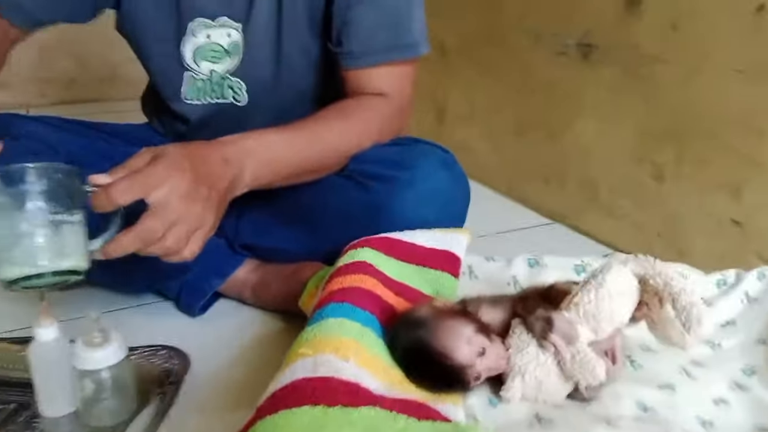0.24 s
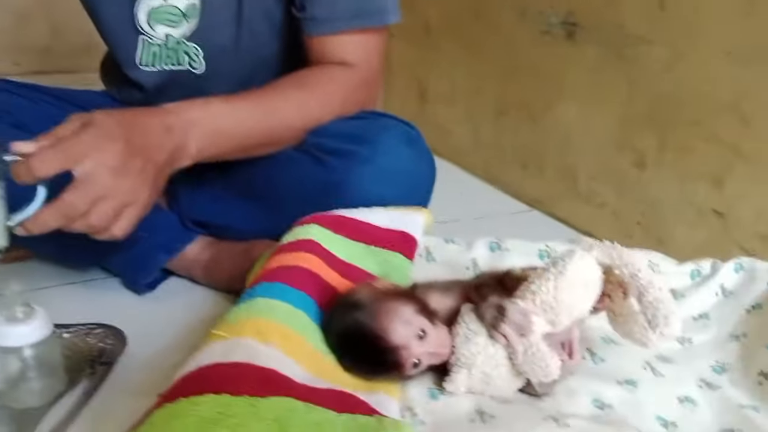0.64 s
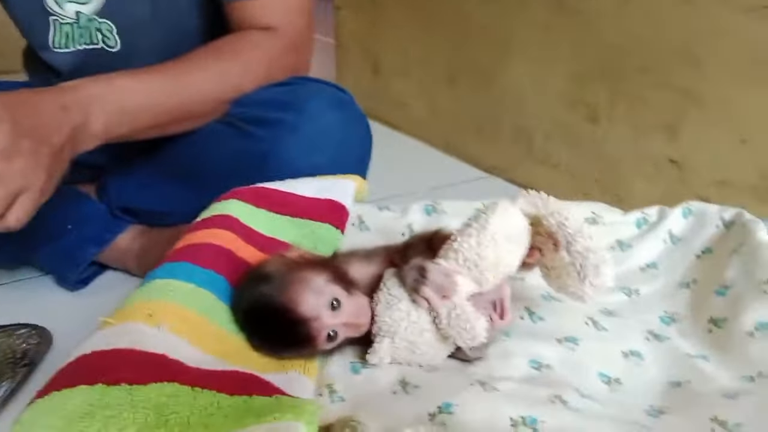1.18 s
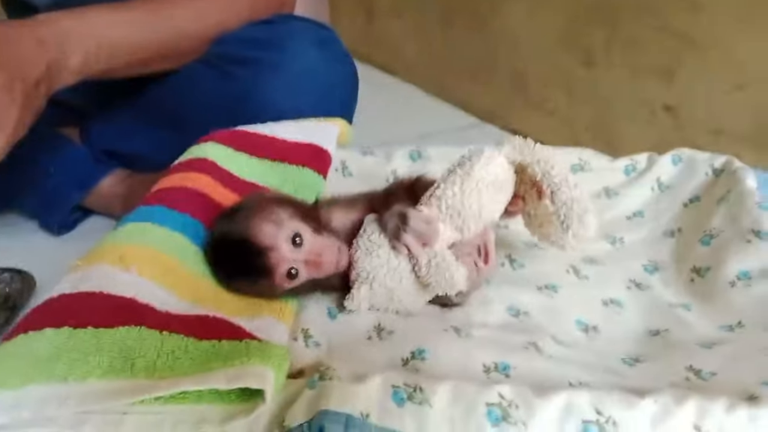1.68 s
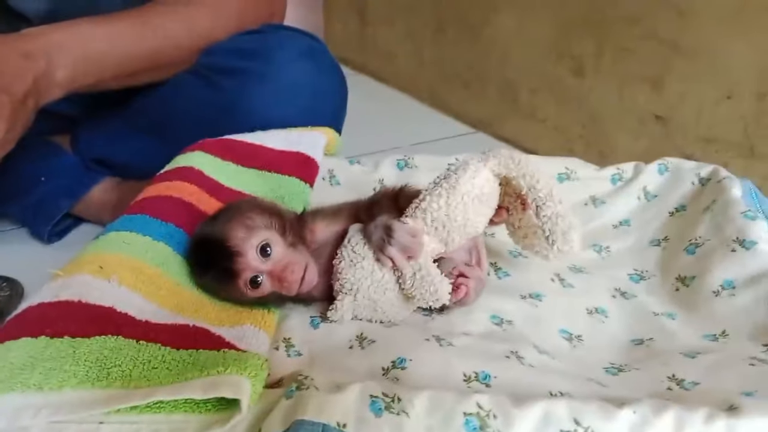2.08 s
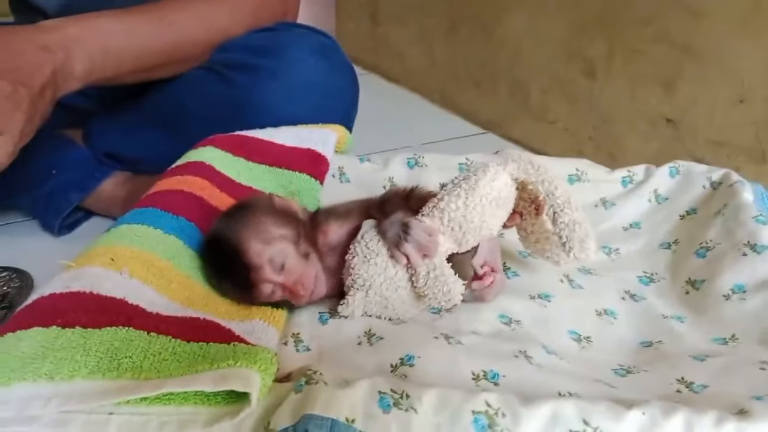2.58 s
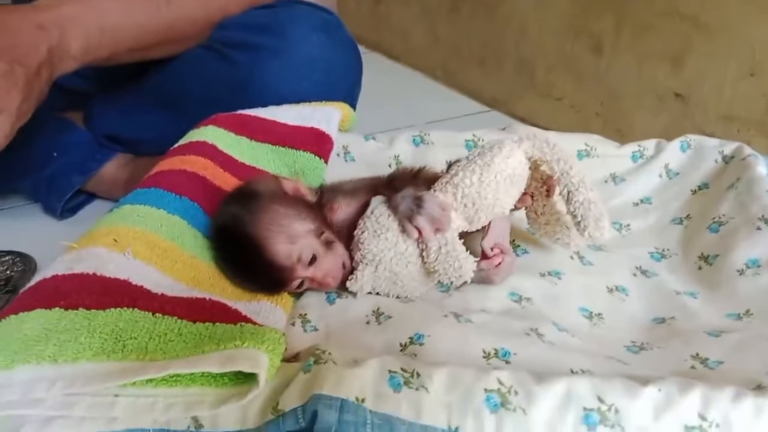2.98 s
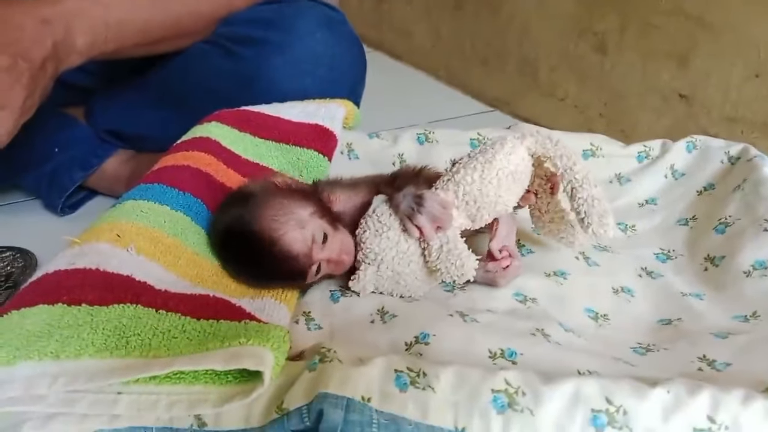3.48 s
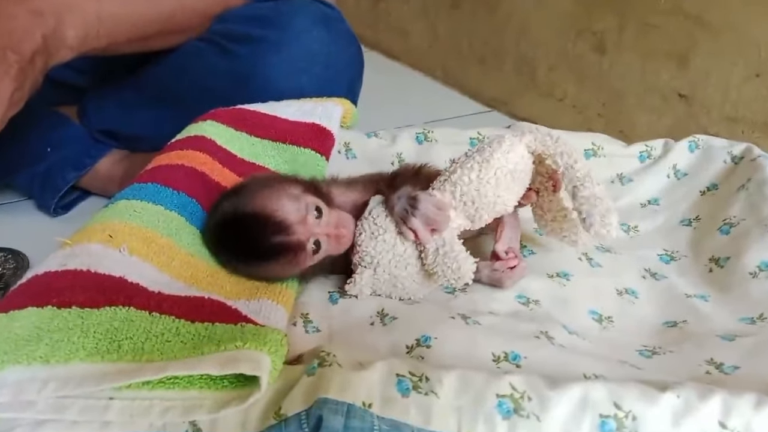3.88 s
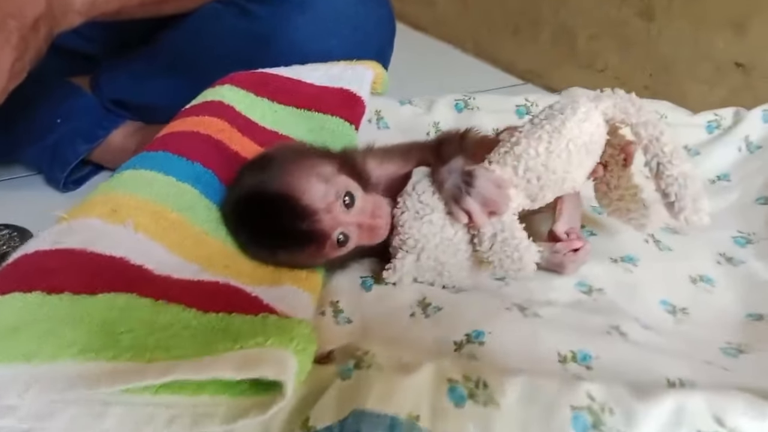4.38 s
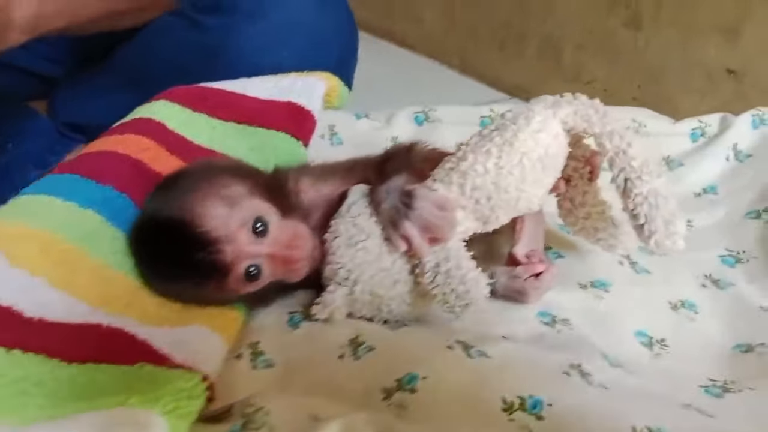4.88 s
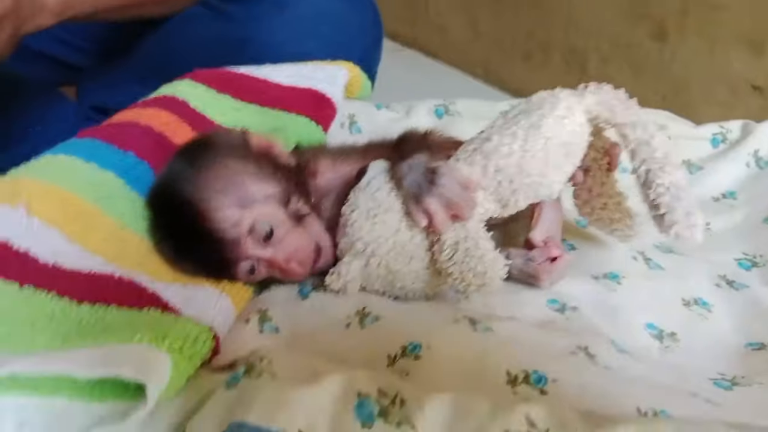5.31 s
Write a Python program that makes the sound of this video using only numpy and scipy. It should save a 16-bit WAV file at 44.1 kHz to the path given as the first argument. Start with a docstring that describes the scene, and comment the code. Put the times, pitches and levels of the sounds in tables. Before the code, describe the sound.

Indoors in a bare, tiled room, a metal spoon taps irregularly inside a glass mug of liquid. Bright clinks come first, then short scrapes and hollow, duller knocks. A low rumble swells and sinks beneath, strongest around the middle, then almost vanishes. Late on, a baby monkey gives one thin, quavering squeak with a faint after-note, before the last knocks and clinks. One-channel sound with faint hiss and a softened extreme top.

```python
"""A metal spoon stirs liquid in a glass mug in a bare, tiled room, over faint hiss with a narrow band that rises and sinks.
From the start a low rumble (shaped noise) swells and sinks, bright clinks (ringing modes plus a noise crack) come
irregularly, and faint sine tones fade. After a second short noise scrapes join in, then duller knocks low in the mug.
The rumble is strongest near 3 s and dies down to a trace near 4 s. At about 4.6 s a baby monkey gives a thin squeak
(a quavering sine with overtones) and a faint after-note; the last knocks and clinks follow."""
import sys
import numpy as np
from scipy import signal
from scipy.fft import rfft, irfft, next_fast_len
from scipy.io import wavfile
from scipy.ndimage import uniform_filter1d, map_coordinates

SR = 44100
rng = np.random.default_rng(int(sys.argv[2]) if len(sys.argv) > 2 else 0)


def dump_mix(stems):
    """Bounce the given channels to the path in sys.argv[1] as a 16-bit WAV at rate SR."""
    frames = np.atleast_2d(stems).T  # one column per channel
    limited = np.clip(frames, -1, 1)  # hard clip at full scale
    pcm = np.round(limited * 32767).astype(np.int16)
    wavfile.write(sys.argv[1], SR, pcm)


N = 244666  # samples in the scene
LENGTH = int(0.55 * SR)  # samples in one blow, and in the room's echo


def amp(db):
    """Turn decibels into a gain."""
    return 10 ** (np.asarray(db) / 20)


def unit(x):
    """Scale a sound to an average strength (rms) of 1."""
    return x / np.sqrt(np.mean(x ** 2) + 1e-30)


def blend(low, high, share):
    """Go part of the way from one set of levels to another."""
    return np.asarray(low) + share * np.subtract(high, low)


def wobble(rate):
    """Draw a smooth random curve through this many random points a second."""
    points = rng.standard_normal(int(N * rate / SR) + 4)
    return map_coordinates(points, [np.arange(N) * rate / SR])


def shape(points, hz):
    """Read the gain at each frequency from (f/Hz, level/dB) points, joined on a log axis."""
    f, db = np.transpose(points)
    return amp(np.interp(np.log(hz + 1), np.log(f + 1), db))


def resonance(hz, centre_hz, width_hz):
    """Gain of one steep-sided resonance, 1 at its centre."""
    return 1 / (1 + (2 * (hz - centre_hz) / width_hz) ** 2) ** 2


def filtered(x, response):
    """Multiply the spectrum of a sound by a gain that depends on frequency."""
    size = next_fast_len(len(x) + SR // 4)  # padded, so the end does not wrap onto the start
    spectrum = rfft(x, size) * response(np.fft.rfftfreq(size, 1 / SR))
    return irfft(spectrum, size)[:len(x)]


def noise(response, size=N):
    """Make coloured noise of rms 1."""
    return unit(filtered(rng.standard_normal(size), response))


def add(track, s, sound):
    """Mix a sound into the track at s seconds."""
    start = max(round(s * SR), 0)
    track[start:start + len(sound)] += sound[:max(len(track) - start, 0)]


def room(x, wet_db):
    """Direct sound, then a diffuse tail that builds up, with a cluster of echoes from the far wall."""
    # how long the room takes to fade by 60 dB: f/Hz, t60/s
    walls = [(400, 0.4), (1200, 0.45), (3000, 0.42), (9000, 0.33), (14000, 0.3)]
    build_s = 0.0055
    slap_db, slap_s, slap_width_s = 3.0, 0.038, 0.0069  # the far wall's echoes
    hz, frames, spectrum = signal.stft(rng.standard_normal(LENGTH), SR, nperseg=256)
    t60 = np.interp(hz, *np.transpose(walls))
    fading = spectrum * amp(-60 * frames / t60[:, None])
    tail = signal.istft(fading, nperseg=256)[1][:LENGTH]
    t = np.arange(LENGTH) / SR
    slap = amp(slap_db * np.exp(-((t - slap_s) / slap_width_s) ** 2))
    tail = tail * (1 - np.exp(-t / build_s)) * slap
    answer = amp(wet_db) * tail / np.linalg.norm(tail)
    answer[0] = 1  # the direct sound
    return signal.fftconvolve(x, answer)[:len(x)]


def hiss():
    """Quiet room air is shaped noise; a narrow, whistling band of noise swells and sinks in a regular cycle."""
    # colour of the room air: f/Hz, level/dB
    air_colour = [(35, -32), (60, -9.5), (93, -3), (159, -2.5), (291, -13.5), (1910, -26), (4850, -38),
                  (9080, -36), (9970, -29), (10900, -37.5), (15500, -38)]
    air_db = -71.0
    period_s, low_db, high_db = 0.865, -84, -70.5
    crest = 0.65  # share of the cycle at which the band is loudest
    cycle = (np.arange(N) / SR / period_s) % 1
    whistle_db = np.interp(cycle, [0, crest, 1], [low_db, high_db, low_db])
    whistle = noise(lambda hz: resonance(hz, 9910, 360))
    air = noise(lambda hz: shape(air_colour, hz))
    return amp(air_db) * air + amp(whistle_db) * whistle


def rumble_gain(band_hz, share_db):
    """Strength of one band of the rumble: its share of the drone, plus the swells centred near it."""
    # level of the steady drone: t/s, level/dB
    drone = [(0, -57.5), (.85, -66), (1.5, -59), (3.4, -59), (3.95, -64), (4.2, -79.5), (5.55, -77)]
    # swells of the rumble: peak t/s, level at the centre/dB, centre f/Hz
    swells = [(.22, -44, 95), (0.499, -41, 76.4), (.7, -56.5, 62), (1.0, -53.5, 91.7), (1.329, -47, 96),
              (1.62, -48.5, 97), (2.22, -57, 95.4), (2.72, -51.5, 70), (2.84, -51, 102),
              (3.071, -37.5, 109.5), (3.2, -42, 98), (3.379, -43.5, 110.3), (3.56, -48, 98.4),
              (3.719, -53.5, 90), (3.979, -53, 108)]
    rise_db_per_s, fall_db_per_s = 232, 146.5
    focus_db = 37.5  # a swell is this much weaker one octave from its centre
    t = np.arange(N) / SR
    drone_db = np.interp(t, *np.transpose(drone))
    power = amp(drone_db + share_db) ** 2
    for s, db, centre_hz in swells:
        fade_db = np.maximum(rise_db_per_s * (s - t), fall_db_per_s * (t - s))
        off_centre_db = focus_db * np.log2(band_hz / centre_hz) ** 2
        power += amp(db - fade_db - off_centre_db) ** 2
    return np.sqrt(power)


def rumble():
    """A low drone of evened-out noise in narrow resonances, with a broader, looser flutter of noise."""
    # resonances of the drone: f/Hz, width/Hz, share of the drone/dB
    boom_bands = [(67.5, 29, -6), (97, 22, -1)]
    # colour of the flutter: f/Hz, level/dB
    flutter_colour = [(20, -13.5), (50, -7.5), (100, -1), (135, 5), (170, -0.5), (215, -6.5), (260, -16.5),
                      (400, -31), (800, -70)]
    track = rumble_gain(152, -8.5) * noise(lambda hz: shape(flutter_colour, hz))
    for centre_hz, width_hz, share_db in boom_bands:
        boom = noise(lambda hz: resonance(hz, centre_hz, width_hz))
        strength = np.sqrt(np.abs(uniform_filter1d(boom ** 2, size=SR // 16)) + 1e-6)
        steady = unit(boom / np.sqrt(strength))  # a drone is steadier than free noise
        track += rumble_gain(centre_hz, share_db) * steady
    return track


def tones():
    """Faint sines waver in pitch and level while they fade away."""
    # lingering tones: start t/s, end t/s, f/Hz, level at the start/dB, fall/dB per s
    faint_tones = [(0, 0.405, 567, -62, 20), (0.737, 1.02, 608.3, -55.5, 50.5),
                   (.738, 1.02, 2130, -57.5, 77.5)]
    attack_s, release_s = 0.0094, 0.058
    waver = 0.0067  # share of the pitch
    t, track = np.arange(N) / SR, np.zeros(N)
    for start, end, hz, db, fall_db in faint_tones:
        gate = np.clip(np.minimum((t - start) / attack_s, (end - t) / release_s), 0, 1)
        phase = 2 * np.pi * hz * np.cumsum(1 + waver * wobble(35)) / SR
        level_db = db - fall_db * np.maximum(t - start, 0) + 2 * wobble(30)
        track += gate * amp(level_db) * np.sin(phase)
    return track


def squeak():
    """The monkey's thin, rough call: a quavering sine with two overtones starts sharp and settles in pitch."""
    # the squeak and its faint after-note: start t/s, length/s, level/dB, settled pitch f/Hz
    calls = [(4.567, 0.18, -62, 3416), (4.77, 0.2, -76, 3445)]
    attack_s, release_s = 0.019, 0.038
    overshoot, settle_s = 0.055, 0.058  # sharp by this share of the pitch at first
    second_db, third_db = -8.5, -14.0  # overtones
    track = np.zeros(N)
    for start, length, db, pitch_hz in calls:
        t = np.maximum(np.arange(N) / SR - start, 0)
        pitch = pitch_hz * (1 + overshoot * np.exp(-t / settle_s))
        quaver = 0.018 * wobble(90) + 0.025 * wobble(500)  # the fast part is the roughness
        phase = 2 * np.pi * np.cumsum(pitch * (1 + quaver)) / SR
        voice = np.sin(phase) + amp(second_db) * np.sin(2 * phase) + amp(third_db) * np.sin(3 * phase)
        gate = np.clip(np.minimum(t / attack_s, (length - t) / release_s), 0, 1)
        track += amp(db) * voice * gate
    return room(track, wet_db=0.0)


def scrapes():
    """The spoon slides along the glass: tiny slips of uneven size fade as the spoon slows."""
    # slides: t/s, fade length/s (cut off at half a second), level/dB, centre f/Hz, width/Hz
    slides = [(1.097, 0.059, -76.5, 2180, 3500), (1.289, 0.049, -61, 7400, 2600),
              (1.315, 0.071, -57.5, 1850, 1360), (1.326, 0.17, -78, 3600, 900),
              (1.861, .06, -59, 1170, 1190), (2.418, 0.57, -83, 1220, 1470),
              (4.539, 0.032, -59.5, 1260, 1135), (4.894, .05, -82.5, 7500, 1770)]
    track, t = np.zeros(N), np.arange(SR // 2) / SR
    for s, length, db, centre_hz, width_hz in slides:
        slip_size = np.exp(rng.standard_normal(len(t)))
        slips = rng.standard_normal(len(t)) * slip_size
        rasp = unit(filtered(slips, lambda hz: resonance(hz, centre_hz, width_hz)))
        fade = np.sqrt(np.clip(1 - t / length, 0, 1))
        add(track, s, amp(db) * rasp * fade)
    return room(track, wet_db=-0.5)


def blow(modes, registers, levels_db, crack_db, crack_t60, scatter_db=0.0):
    """A noise crack plus ringing modes; where the spoon lands sets how strongly each register speaks."""
    # colour of the instant of contact: f/Hz, level/dB
    crack_colour = [(400, -28), (700, -9), (1300, -3), (3000, -3), (4200, 2.5), (4900, -24.5), (5600, 4),
                    (6200, -8), (7600, -4.5), (10800, 1), (11800, -14), (13000, -12.5), (13900, -20.5),
                    (15000, -23.5)]
    t = np.arange(LENGTH) / SR
    ring = np.zeros(LENGTH)
    for hz, db, t60 in modes:
        mode_db = db + scatter_db * rng.normal() - 60 * t / t60
        ring += amp(mode_db) * np.sin(2 * np.pi * (hz * t + rng.random()))
    crack = amp(crack_db - 60 * t / crack_t60) * noise(lambda hz: shape(crack_colour, hz), size=LENGTH)
    hit = np.zeros(LENGTH)
    for band, db in zip(registers, levels_db):
        sos = signal.butter(N=6, Wn=band, btype="band", fs=SR, output="sos")
        hit += amp(db) * unit(signal.sosfilt(sos, ring + crack))
    return hit


def knocks():
    """Contacts under the liquid are cushioned and hollow; the spoon touches again a moment later."""
    # dull knocks low in the mug: t/s, level/dB, hollowness/0-1
    dull_hits = [(1.749, -81.5, 0.5), (1.871, -63.5, 0), (2.009, -65.5, 0.85), (2.413, -75, 0.97),
                 (2.505, -66, 1), (2.702, -63.5, 0.94), (2.831, -71.5, 1), (3.351, -59, 0.3),
                 (4.763, -64, 1), (5.02, -62, 0.6), (5.212, -63, 0.87), (5.236, -59, 0.57)]
    # registers of a knock: low edge f/Hz, high edge f/Hz
    dull_bands = [(350, 700), (700, 2100), (2100, 6000), (7000, 15500)]
    # modes of the mug's base and liquid: f/Hz, level before scatter/dB, t60/s
    base_modes = [(491.5, 1.5, 0.14), (520.5, 4, 0.091), (595, 7, 0.051), (778, -9, 0.03), (941, -1, 0.02),
                  (1223, -10, 0.049), (1376, -8.5, 0.051), (1590, 2.5, 0.018), (1994, -20, 0.0203),
                  (2927, -13.5, 0.059), (3300, -0.5, 0.0287), (3793, -16.5, 0.103), (10550, 16, 0.022),
                  (11700, -10.5, 0.044)]
    # strength of each register in a flat and in a hollow knock: level/dB
    flat_db = [-17.5, 0.5, -19, -32]
    hollow_db = [-3, -1, -18, -13]
    track, t = np.zeros(N), np.arange(LENGTH) / SR
    cushion = 1 - np.exp(-t / 0.003)  # a soft start
    for s, level_db, hollowness in dull_hits:
        levels_db = blend(flat_db, hollow_db, hollowness)
        hit = cushion * blow(base_modes, dull_bands, levels_db, crack_db=2.5, crack_t60=0.036, scatter_db=5.5)
        again = cushion * blow(base_modes, dull_bands, levels_db, crack_db=3, crack_t60=0.014, scatter_db=3)
        add(hit, 0.011 * rng.uniform(0.49, 1.7), again)
        add(track, s, amp(level_db) * room(hit, wet_db=-6.0))
    return track


def clinks():
    """The spoon hits the glass wall; harder contacts are brighter, and each favours one of the mug's modes."""
    # hits: t/s, level/dB, hardness/0-1, extra ring of the rim/dB, wanted note f/Hz, note over the level/dB
    wall_hits = [(0.2, -52.5, 0.79, -2.5, 2973, -1.5), (0.457, -52, 0.21, 2, 1256, 3),
                 (.488, -62, 0.16, -14, 2213, 6), (1.293, -78, 0.77, -4, 1810, 6),
                 (1.422, -90, 1, -10, 1957, -3), (1.549, -104, 1, 2.5, 1957, -4),
                 (1.84, -75.5, 0.18, -3, 2707, 8), (1.915, -66.5, 0.31, 13.5, 2000, 2.5),
                 (2.357, -76, 0.78, -2, 1110, 9), (2.393, -83, 0.14, -9, 1224, 14),
                 (2.958, -55, 1, -0.5, 1980, 7.5), (2.995, -61, 0.71, 8, 2004, 5),
                 (3.176, -57, 0.24, 0, 1270, 3.5), (3.205, -68.5, 0.01, 10, 766, 6),
                 (3.33, -74, 0.61, -11, 1120, 13), (3.604, -85.5, 0.49, 9.5, 1990, 3.5),
                 (4.139, -65, 0.62, 10, 1780, 2), (4.188, -64, 0.18, 3, 2973, -6),
                 (4.21, -78.5, 0.02, 3, 870, 9.5), (4.507, -99, 0.5, 12, 2440, 14.5),
                 (4.522, -81.5, 0.85, 2, 1350, 2), (4.918, -96, 0.9, 6.5, 1110, 2),
                 (5.235, -66, 0.85, 1, 12250, -4.5), (5.5, -73.5, .2, 8.5, 2770, -2)]
    # registers of a clink: low edge f/Hz, high edge f/Hz
    bright_bands = [(600, 1600), (1600, 3500), (3500, 6200), (6500, 11300), (11600, 15500)]
    # modes of the filled mug: f/Hz, level/dB, t60/s
    glass_modes = [(763, 1.5, 0.029), (870, -18, 0.044), (1108, -12, 0.24), (1186, 8, 0.03),
                   (1320, 2, 0.044), (1463, -5, 0.23), (1763, 2.5, 0.043), (1961, 2, 0.069),
                   (2190, -9.5, 0.047), (2474, -3.5, 0.031), (2720, 5.5, 0.015), (2976, -16, 0.26),
                   (3700, -11, .06), (4490, -8.5, .25), (5610, -7, .28), (7400, -11, .07), (7850, -11, .18),
                   (8550, -4, .11), (9700, -20.5, 0.033), (10000, -13, 0.33), (10080, 1, 0.27),
                   (13230, -7, 0.018), (12900, -21, 0.063)]
    # strength of each register under the softest and the hardest contact: level/dB
    soft_db = [9, 0.5, -31, -20.5, -32]
    hard_db = [-15, -1, -4.5, 5.5, -3.5]
    note_t60_s = 0.049  # the liquid soon damps the favoured note
    after_db, after_t60_s = -26, 0.35  # a faint part of it rings on
    track, t = np.zeros(N), np.arange(LENGTH) / SR
    contact = 1 - np.exp(-t / 0.00028)  # a very quick start
    modes_hz = np.transpose(glass_modes)[0]
    for s, level_db, hardness, rim_db, note_hz, note_db in wall_hits:
        levels_db = blend(soft_db, hard_db, hardness)
        levels_db[2] += rim_db  # the rim rings in the middle register
        hit = blow(glass_modes, bright_bands, levels_db, crack_db=13.0, crack_t60=0.018)
        favoured_hz = modes_hz[np.argmin(np.abs(modes_hz - note_hz))]  # the mode nearest the wanted note
        fade = amp(-60 * t / note_t60_s) + amp(after_db - 60 * t / after_t60_s)
        note = unit(np.sin(2 * np.pi * favoured_hz * t) * fade)
        clink = contact * (hit + amp(note_db) * note)
        add(track, s, amp(level_db) * room(clink, wet_db=2.0))
    return track


def scene():
    """Add up all the sources in one channel."""
    return (hiss() + rumble() + tones() + squeak() + scrapes() + knocks() + clinks())[None]


def record(dry):
    """Keep nothing at or above the band limit of 15650 Hz."""
    return np.array([filtered(channel, lambda hz: hz < 15650) for channel in dry])


dry = scene()
out = record(dry)
dump_mix(out)
```